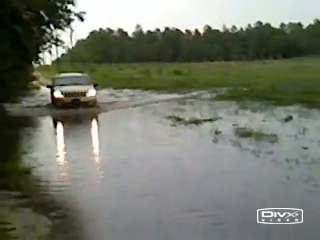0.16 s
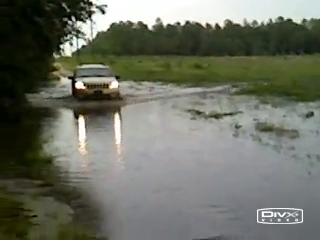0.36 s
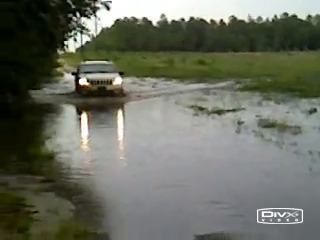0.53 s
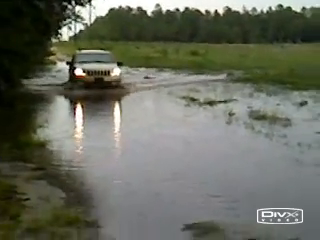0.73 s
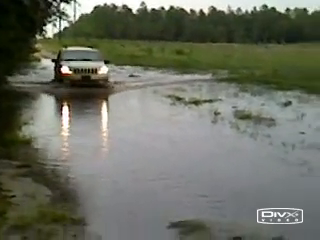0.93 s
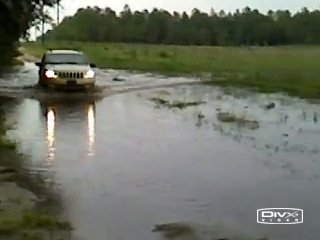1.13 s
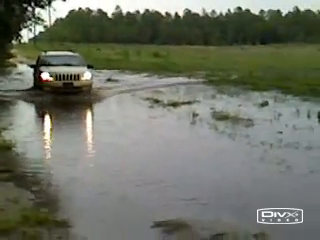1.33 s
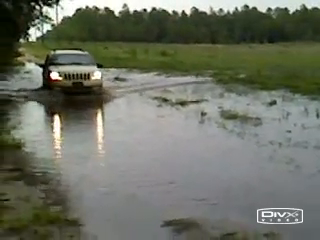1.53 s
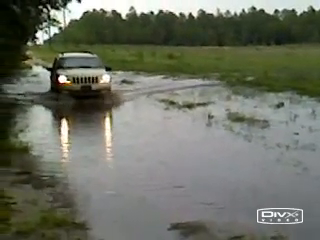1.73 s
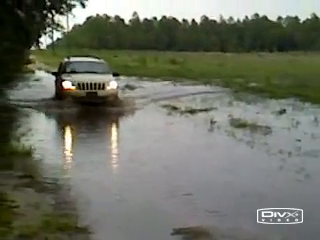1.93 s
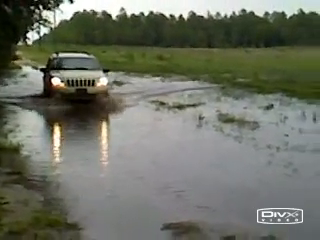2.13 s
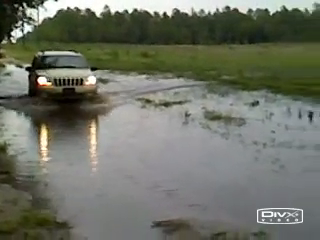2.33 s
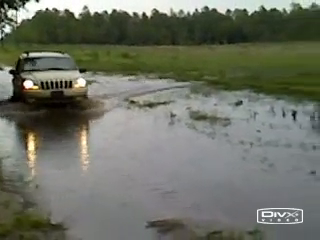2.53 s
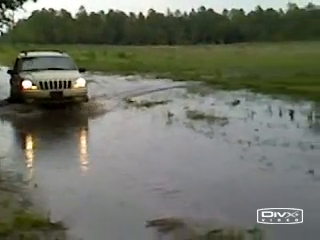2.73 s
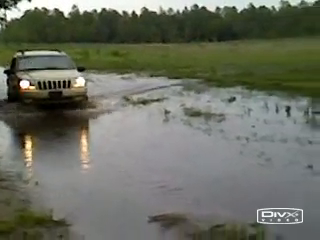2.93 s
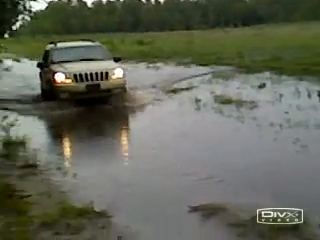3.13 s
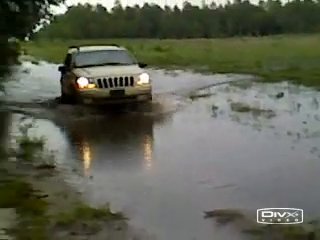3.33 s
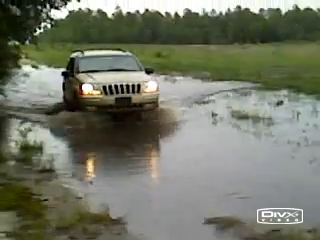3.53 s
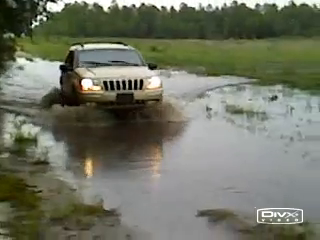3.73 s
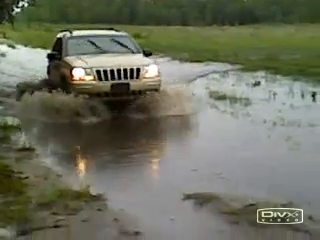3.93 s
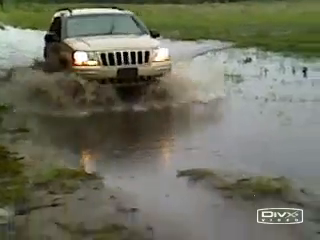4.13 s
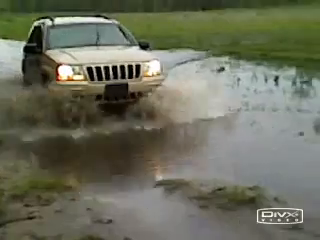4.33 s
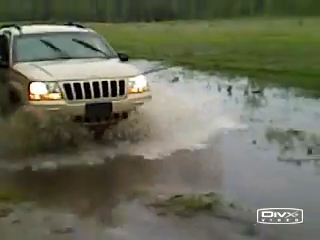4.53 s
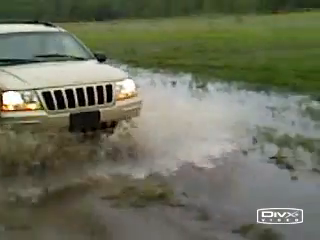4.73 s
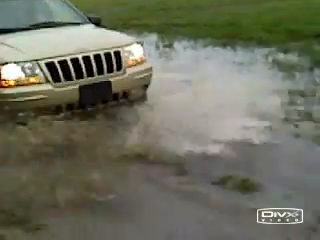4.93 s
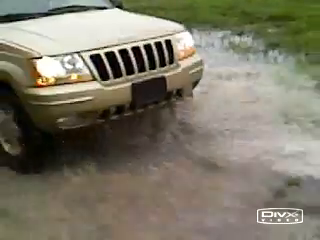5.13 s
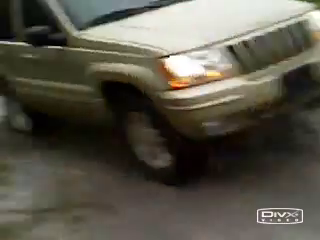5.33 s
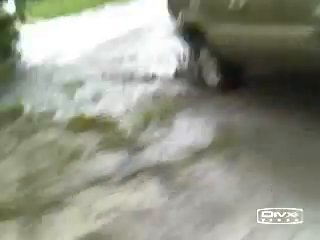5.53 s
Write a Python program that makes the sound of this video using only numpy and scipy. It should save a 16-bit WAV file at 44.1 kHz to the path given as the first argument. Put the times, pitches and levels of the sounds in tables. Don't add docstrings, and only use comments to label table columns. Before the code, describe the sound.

Outdoors on a flooded dirt track, a heavy car approaches through deep water. At first there is only a quiet, hollow rush with occasional soft gulps. After about three and a half seconds the water piles up, churning and gurgling, with a brief faint engine drone. The splash swells into broad, bright foam and spray right beside the small, coarse-sounding camera microphone, and is still loud at the end.

```python
import sys
import numpy as np
from scipy import signal
from scipy.fft import rfft, irfft
from scipy.io import wavfile
from scipy.ndimage import uniform_filter1d, map_coordinates

SR = 44100
rng = np.random.default_rng(int(sys.argv[2]) if len(sys.argv) > 2 else 0)


def put_to_file(sound):
    columns = np.atleast_2d(sound).T
    safe = np.clip(columns, -1, 1)
    whole_steps = np.round(safe * 32767)
    wavfile.write(sys.argv[1], SR, whole_steps.astype(np.int16))


def to_linear_factor(level_db):
    exponent = np.asarray(level_db, float) / 20
    return 10 ** exponent


N = 245637

# (time [s], level [dB])
WAVE_LEVEL = [(0, -45), (.4, -43), (.9, -44), (1.3, -41), (1.55, -42), (1.85, -41), (2.2, -41), (2.7, -40),
              (3.2, -40), (3.45, -38), (3.7, -36), (3.9, -33), (4.2, -31.5), (4.55, -31), (4.9, -30),
              (5.2, -29.5), (5.4, -30.5), (5.57, -29)]
# (time [s], nearness [0-1], water piled under the body [0-1])
APPROACH = [
    (0, 0.01, 0.62),
    (1.5, 0.39, 0.28),
    (3.2, 0.44, 0.11),
    (3.7, 0.31, 0.79),
    (4.0, 0.32, .75),
    (4.3, 0.48, 0.53),
    (4.8, 0.87, 0.6),
    (5.25, 0.89, 0.45),
    (5.57, 0.74, 0.),
]
# (time [s], half length [s], level [dB])
SURGES = [(0.3, 0.025, 3), (0.874, 0.061, 1), (1.647, 0.04, 5.5), (1.72, 0.037, 2), (2.302, 0.026, 3),
          (3.01, 0.044, 2), (3.796, 0.046, 1.5), (3.967, 0.026, 0), (4.35, 0.054, 1.5), (4.493, 0.02, 0),
          (4.615, 0.021, 1.5), (4.825, .03, -2.5), (5.062, 0.047, 1), (5.222, 0.033, 2),
          (5.294, 0.029, 5.5), (5.39, 0.028, -1), (5.432, .02, 2.5)]
# (frequency [Hz], density [dB per Hz])
FAR_COLOUR = [(18, -62), (30, -34), (53, -14), (86, -15), (135, -16.5), (485, -1.5), (619, -4.5),
              (790, -11), (1290, 3), (1740, -10.5), (2560, -11.5), (2900, -19), (3550, -17.5),
              (3850, -20.5), (5000, -65), (8470, -120)]
# (frequency [Hz], density [dB per Hz])
NEAR_COLOUR = [(18, -46), (30, -28), (81, -10.5), (140, -13), (323, -6.5), (559, -5.5), (822, -4),
               (1190, -4.5), (1670, -7.5), (1970, -9.5), (2320, -13.5), (2780, -11.5), (3550, -17),
               (3850, -20.5), (5000, -57), (8470, -120)]
# (time [s], first pitch [Hz], last pitch [Hz], level over wave [dB])
GURGLES = [(.364, 515, 341, 1.5), (.858, 392, 464, 2.5), (1.174, 479, 465, -0.5), (1.275, 520, 515, 3),
           (1.409, 471, 462, 5), (1.559, 391, 392, -1), (1.69, 380, 246, 0), (1.975, 521, 518, 0.5),
           (2.77, 523, 422, -1.5), (3.01, 554, 605, 2), (3.334, 429.5, 507, -0.5), (3.566, 429, 429, -0.5),
           (3.709, 475, 422, 0), (3.774, 467, 300, 6), (3.918, 390, 301, 6), (4.033, 300, 479, 8),
           (4.107, 391, 421, 8), (4.218, 389, 343, 3.5), (4.412, 342, 375, 5.5), (4.64, 345, 295, 1.5),
           (4.759, 340, 342, 0.5), (4.861, 612, 590, 5), (4.862, 304, 302, 2), (5.031, 265, 170, 1),
           (5.15, 382, 434, 2), (5.256, 388, 338, 1.5), (5.09, 388, 392, 0.5), (5.413, 338, 336, 1),
           (5.444, 643, 596, 0.5), (4.47, 344.6, 340, 0.5)]
# (time [s], first pitch [Hz], last pitch [Hz], level over wave [dB])
JETS = [(.621, 1117, 1317, 1), (1.235, 1340, 1233, 4), (1.31, 1250, 1367, 4), (1.438, 1290, 1256, 2.5),
        (2.033, 1290, 1244, 1), (2.262, 1250, 1295, 5.5), (2.313, 1252, 1210, 0.5),
        (5.465, 1960, 1720, 3.5), (3.486, 1380, 1250, 5.5), (3.816, 1414, 1443, 9.5),
        (3.921, 2780, 2680, -2.5), (4.058, 1340, 1217, 4), (4.2, 1250, 1112, 2), (5.42, 1320, 1056, 2.5),
        (4.36, 2000, 1960, 5), (4.375, 1362, 1380, 8), (4.456, 1420, 1320, 6), (4.555, 1290, 1166, 3.5),
        (4.616, 1396, 1358, 6.5), (4.644, 1330, 1044, 3), (5.375, 1900, 2170, 3.5), (4.984, 1030, 1000, 2),
        (5.097, 2760, 2870, -4.5), (5.24, 1300, 1210, -1.5), (5.288, 2490, 2320, 6), (5.346, 1040, 1177, 0),
        (5.43, 1940, 2000, 5), (5.476, 1250, 1140, 0), (5.517, 1160, 1216, 3), (5.539, 1940, 1997, 4)]
# (pitch [Hz], spread [share of pitch], level over wave [dB])
SMALL_HOLLOWS = [
    (436.8, 0.22, -5.5),
    (1270, 0.11, -3),
    (2490, 0.22, -7.5),
]
# (time [s], beat [Hz])
ENGINE_BEAT = [
    (3.55, 33.8),
    (3.74, 40.3),
    (3.854, 43.5),
    (4.012, 46.7),
    (4.19, 48.8),
    (4.3, 48.6),
]
# (multiple of the beat, loudest at [s], half length [s], level [dB])
ENGINE_ORDERS = [
    (5, 3.74, .09, -40.5),
    (5, 4.1, 0.17, -43),
    (6, 3.97, .13, -37),
    (8, 3.76, .12, -41.5),
    (8, 7.4, .04, -42),
    (10, 4.01, 0.054, -32),
    (10, 3.58, 0.033, -42),
]
# (frequency [Hz], threshold against the level nearby [dB])
GAP_THRESHOLD = [
    (200, -30),
    (4000, -13),
    (6800, -13),
    (8000, -6.5),
    (9500, -12),
    (12000, -8.5),
]

CAMERA_SAMPLE_HZ, CAMERA_EDGE_HZ = 8005.57, 3885


def evened(x):
    return x / np.sqrt(np.mean(np.abs(x) ** 2) + 1e-20)


def read(points, hz):
    f, value = np.transpose(points)
    return np.interp(np.log(hz + 1), np.log(f + 1), value)


def curves(rows, t):
    s, *columns = np.transpose(rows)
    return [np.interp(t, s, c) for c in columns]


def add(mix, s, sound):
    part = mix[max(round(s * SR), 0):][:len(sound)]
    part += sound[:len(part)]


def bubble(hz, cycles, glide):
    u = np.arange(int(4 * cycles * SR / hz)) * hz / SR
    ring = np.sin(2 * np.pi * u * (1 + glide * u / cycles))
    return ring * np.exp(-u / cycles) * (1 - np.exp(-u / (0.39 * cycles)))


def droplets(per_s, spread_db, ring_cycles, spit_cycles, count=36):
    out = np.zeros(N + 4096)
    chance = rng.random(len(out))
    size = rng.exponential(1, len(out))
    kind = rng.integers(0, count, len(out))
    hits = (chance < per_s / SR) * to_linear_factor(spread_db * np.minimum(size, 5))
    for k, hz in enumerate(np.linspace(250, 3900, count)):
        shape = bubble(hz, ring_cycles if k % 2 else spit_cycles, .02)
        out += signal.oaconvolve(hits * (kind == k), shape / np.linalg.norm(shape))[:len(out)]
    return signal.stft(out, SR, nperseg=1024, noverlap=896)


def foam(hz, t, drops):
    a, b = rng.standard_normal((2, len(hz), len(t)))
    drop_share = .4 / (1 + (1900 / (hz[:, None] + 1)) ** 4)
    drops = drops / np.sqrt(np.mean(abs(drops) ** 2, 1) + 1e-12)[:, None]
    return np.sqrt(1 - drop_share) * evened(a + 1j * b) + np.sqrt(drop_share) * drops


def zones(hz, t, near, piled, surge_db):
    lumps = evened(uniform_filter1d(rng.standard_normal((3, len(t))), size=12, axis=1))
    late_surge_db = np.interp(t - .04, t, surge_db)
    churn_db = -3 + 9 * piled + 0.82 * (late_surge_db - .4 * surge_db) + .7 * lumps[0]
    spray_db = -1.36 + 5 * near - 0.39 * surge_db + 0.46 * lumps[1]
    rumble_db = -0.4 + .2 * surge_db + 0.8 * lumps[2]
    churn_edge_hz, spray_edge_hz, rumble_edge_hz = 640, 2040, 177
    return (np.outer(1 / (1 + (hz / churn_edge_hz) ** 6), churn_db)
            + np.outer(1 / (1 + (spray_edge_hz / (hz + 1)) ** 6), spray_db)
            + np.outer(1 / (1 + (hz / rumble_edge_hz) ** 6), rumble_db))


def bow_wave():
    hz, t, drops = droplets(per_s=2500, spread_db=0.0, ring_cycles=16.0, spit_cycles=2.5)
    z = foam(hz, t, drops)
    patches = rng.standard_normal((len(hz), len(t)))
    patches = evened(uniform_filter1d(uniform_filter1d(patches, size=6, axis=0), size=26, axis=1))
    flicker = evened(uniform_filter1d(rng.standard_normal(len(t)), size=4))
    rush_db = curves(WAVE_LEVEL, t)[0]
    near, piled = curves(APPROACH, t)
    surge_db = sum(db * np.exp(-((t - s) / half) ** 2) for s, half, db in SURGES)
    near = np.clip(near + 0.077 * surge_db, 0, 1)
    colour_db = np.outer(read(FAR_COLOUR, hz), 1 - near) + np.outer(read(NEAR_COLOUR, hz), near)
    level_db = rush_db + surge_db + colour_db + zones(hz, t, near, piled, surge_db)
    level_db += 1.1 * patches + 0.09 * flicker - 4.5
    z = z * to_linear_factor(level_db) * (hz < CAMERA_SAMPLE_HZ / 2)[:, None]
    return signal.istft(z, SR, nperseg=1024, noverlap=896)[1][:N]


def sing(events):
    out = np.zeros(N)
    shakes = uniform_filter1d(rng.standard_normal((len(events), 2, 6000)), size=420, axis=2)
    for (s, first_hz, last_hz, db), (pitch, level) in zip(events, shakes):
        n = int(np.clip(1.3 * (.07 - 0.19 * db) * SR, 900, 6000))
        hz = np.linspace(first_hz, last_hz, n) + (16 + .012 * first_hz) * evened(pitch)[:n]
        near_db = 4.5 * curves(APPROACH, s)[0]
        level_db = curves(WAVE_LEVEL, s)[0] + db - 4.5 + near_db + 1.8 * evened(level)[:n]
        swell = np.hanning(n) * to_linear_factor(level_db)
        add(out, s - n / SR / 2, swell * np.sin(2 * np.pi * np.cumsum(hz) / SR))
    return out


def gurgles():
    return sing(GURGLES)


def jets():
    return sing(JETS)


def small_hollows(count=54):
    when, size, slide = rng.random((count, 3)).T
    mid_hz, spread, over_db = np.resize(SMALL_HOLLOWS, (count, 3)).T
    first_hz = mid_hz * (1 + spread * (2 * size - 1))
    last_hz = first_hz * (1 + .25 * (slide - .6))
    return sing(list(zip(when * N / SR, first_hz, last_hz, over_db)))


def engine():
    t = np.arange(N) / SR
    turns = np.cumsum(curves(ENGINE_BEAT, t)[0]) / SR
    out = np.zeros(N)
    for k, s, half, db in ENGINE_ORDERS:
        swell = to_linear_factor(db) * np.exp(-((t - s) / half) ** 2)
        out += swell * np.sin(2 * np.pi * (k * turns + rng.random()))
    return out


def scene():
    return (bow_wave() + gurgles() + jets() + small_hollows() + engine())[None]


def drop_gaps(x, size=1024, lead=82):
    n, k = np.arange(2 * size), np.arange(size) + .5
    window = signal.windows.kaiser_bessel_derived(2 * size, 4 * np.pi)
    basis = window * np.cos(np.pi / size * np.outer(k, n + .5 + size / 2))
    blocks = np.pad(x, (size + lead, 2 * size - (N + lead) % size)).reshape(-1, size)
    lines = np.hstack([blocks[:-1], blocks[1:]]) @ basis.T
    close = uniform_filter1d(uniform_filter1d(lines ** 2, size=5, axis=1), size=3, axis=0)
    nearby = uniform_filter1d(close, size=90, axis=1)
    kept = close > nearby * to_linear_factor(2 * read(GAP_THRESHOLD, k * SR / (2 * size)))
    step = .13 * np.sqrt(nearby) + 1e-9
    frames = (np.round(lines / step) * step * kept) @ basis * 2 / size
    return (frames[1:, :size] + frames[:-1, size:]).ravel()[lead:][:N]


def roll_off(x):
    return signal.sosfilt(signal.butter(12, 12720, fs=SR, output="sos"), x)


def record(dry):
    hz = np.fft.rfftfreq(N, 1 / SR)
    edge = to_linear_factor(np.clip((CAMERA_EDGE_HZ - hz) * 0.57, -65, 0))
    edge = edge / np.sinc(np.minimum(hz, CAMERA_EDGE_HZ) / CAMERA_SAMPLE_HZ)
    edge = edge / (1 + (36 / (hz + 1)) ** 4)
    fine = irfft(rfft(dry) * edge, N)
    ticks = np.floor(np.arange(N) * CAMERA_SAMPLE_HZ / SR) * SR / CAMERA_SAMPLE_HZ
    held = map_coordinates(fine[0], [ticks], order=3)
    mix = drop_gaps(held)[None]
    return roll_off(mix)


dry = scene()
out = record(dry)
put_to_file(out)
```